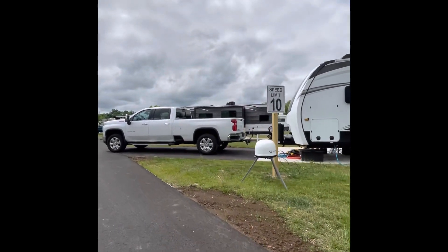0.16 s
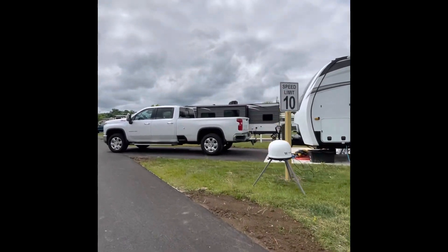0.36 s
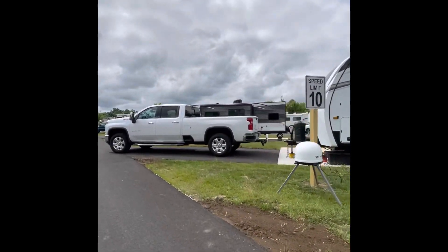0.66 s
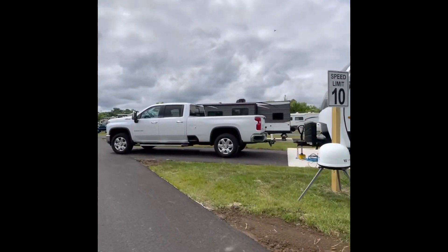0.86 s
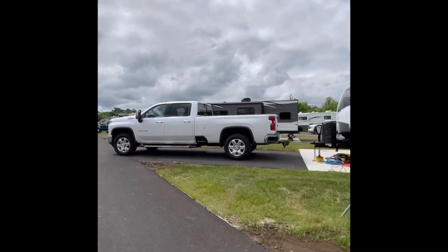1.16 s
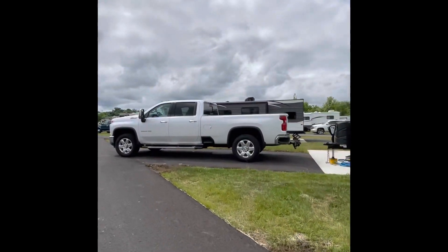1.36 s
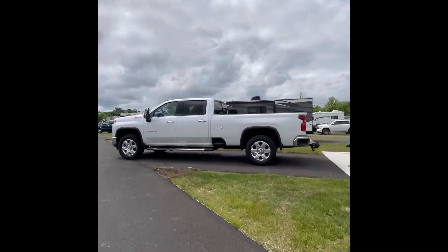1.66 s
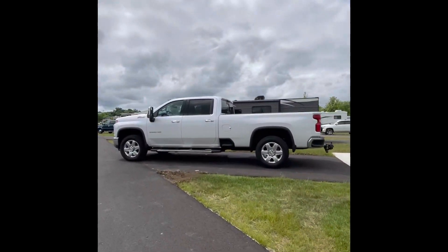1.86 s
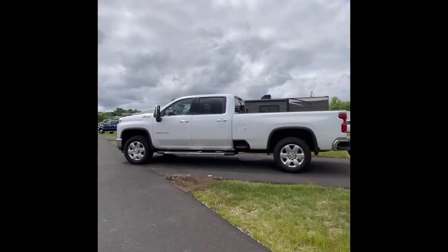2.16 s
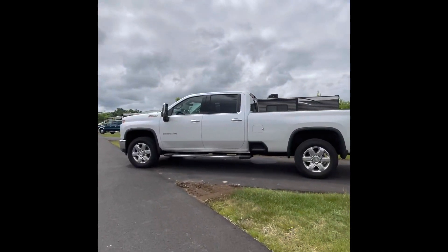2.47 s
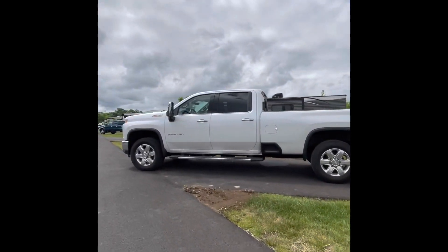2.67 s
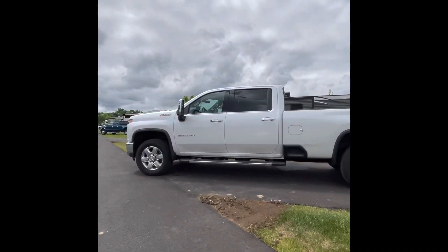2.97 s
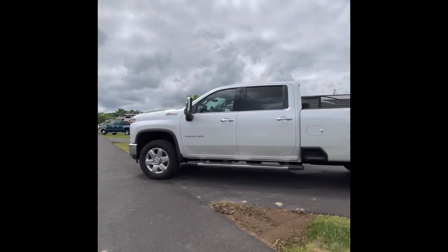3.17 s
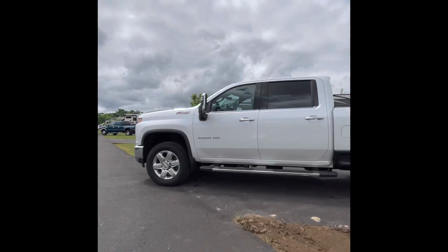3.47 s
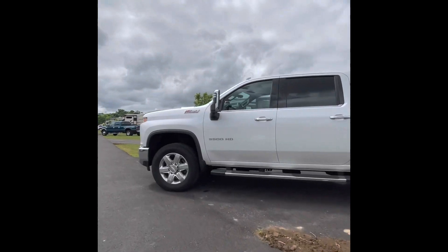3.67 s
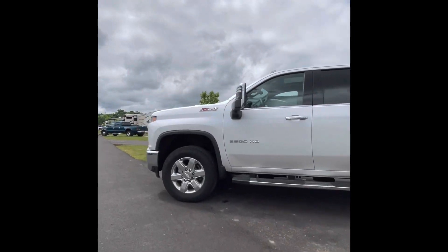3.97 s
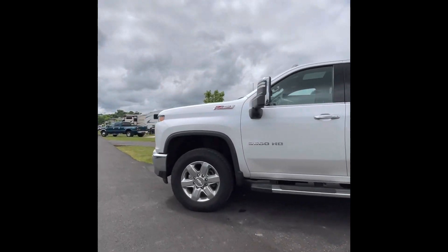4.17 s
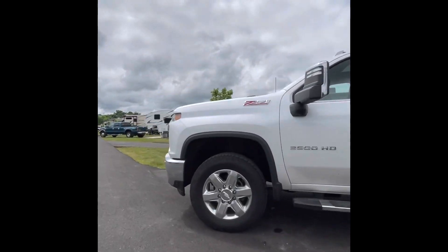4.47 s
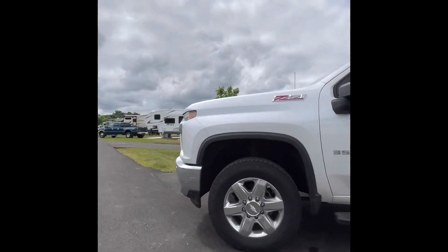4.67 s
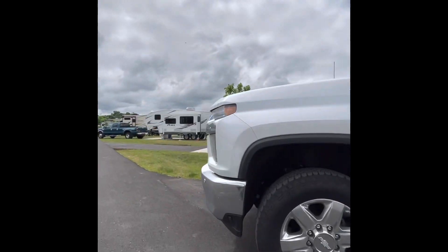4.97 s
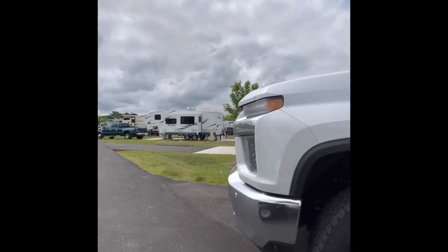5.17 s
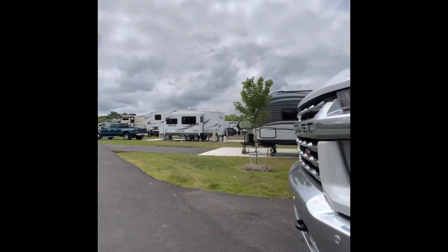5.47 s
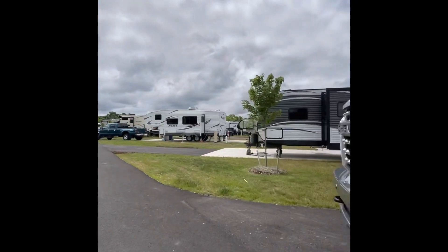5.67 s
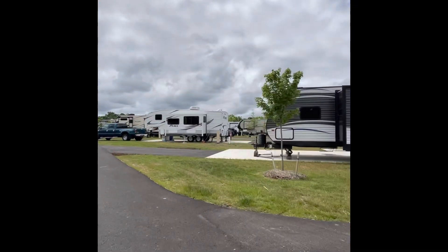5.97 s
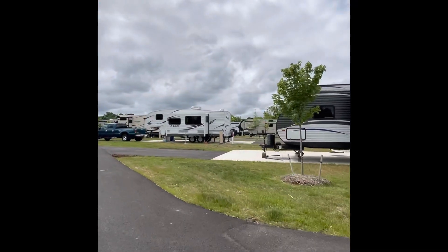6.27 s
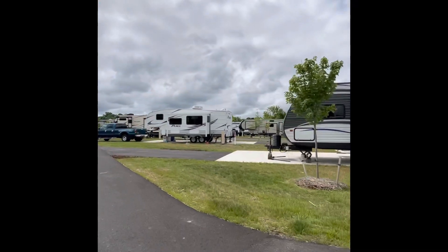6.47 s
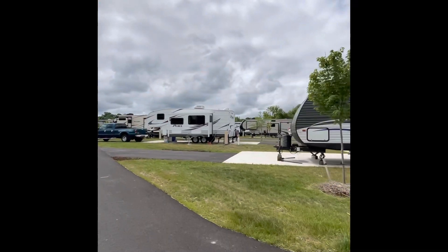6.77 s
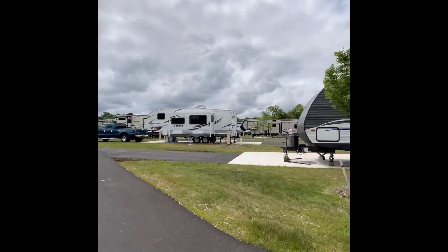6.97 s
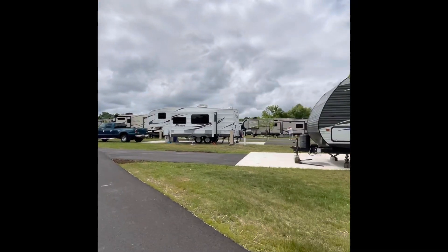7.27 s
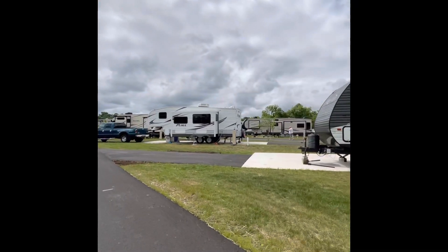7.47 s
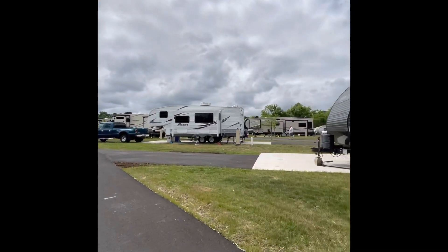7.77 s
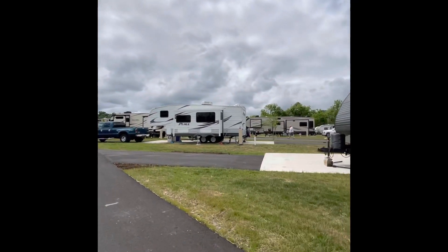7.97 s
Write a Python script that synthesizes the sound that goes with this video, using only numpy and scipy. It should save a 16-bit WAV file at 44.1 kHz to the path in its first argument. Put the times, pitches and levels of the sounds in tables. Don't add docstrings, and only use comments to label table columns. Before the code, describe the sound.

Close on-board sound of a small one-cylinder cart driving outdoors on pavement. A deep, rapid engine throb speeds up with a faint whine and valve clatter, then eases as wind bumps the microphone. Passing a parked truck, the roar reflects back with a brief falling belt whistle and sharp grit cracks. Afterward the firing slows to a low throb and begins to gather again.

```python
import sys
import numpy as np
from scipy import signal
from scipy.fft import irfft
from scipy.io import wavfile
from scipy.ndimage import uniform_filter1d

SR = 44100
rng = np.random.default_rng(int(sys.argv[2]) if len(sys.argv) > 2 else 0)


def amplitude_ratio(level_db):
    exponent = np.asarray(level_db, float) / 20
    return 10 ** exponent


def transcribe(u):
    v = np.clip(np.atleast_2d(u).T, -1, 1)
    q = np.round(v * 32767).astype(np.int16)
    wavfile.write(sys.argv[1], SR, q)


N = 357695
TIME = np.arange(N) / SR
HZ = np.fft.rfftfreq(N + 1 - N % 2 + 10000, 1 / SR)


def evened(x):
    return x / np.sqrt(np.mean(x ** 2) + 1e-20)


def curves(rows):
    seconds, *columns = np.transpose(rows)
    return [np.interp(TIME, seconds, column) for column in columns]


def read(points, hz, order=1):
    table = np.transpose(points)
    return np.interp(np.log(hz + 1), np.log(table[0] + 1), table[order])


def wander(rate_hz, count=1):
    seconds = np.arange(0, N / SR + 1, 1 / 400)
    lowpass = signal.butter(2, rate_hz, fs=400)
    slow = signal.lfilter(*lowpass, rng.standard_normal((count, len(seconds) + 200)))
    slow = slow[:, 200:]
    return np.array([np.interp(TIME, seconds, evened(row)) for row in slow])


def band(x, lo_hz, hi_hz):
    sos = signal.butter(3, [lo_hz, min(hi_hz, 20000)], "band", fs=SR, output="sos")
    return evened(signal.sosfilt(sos, x))


def beside_trailer():
    return np.clip(1 - TIME / 0.9, 0, 1)


# time_s, firing_rate_hz
GOVERNOR = [(0.0, 19.49), (0.5, 21.62), (1.0, 22.63), (1.4, 21.94), (2.0, 19.7), (2.6, 18.05), (3.2, 17.44),
            (3.7, 17.86), (4.2, 19.43), (4.7, 20.77), (5.1, 19.98), (5.8, 17.85), (6.4, 16.18),
            (6.8, 15.42), (7.2, 15.93), (7.7, 16.83), (8.11, 17.33)]
INERTIA_S, THROTTLE_S = 0.3, 0.2
FULL_PULL = 2


def speed():
    rate = uniform_filter1d(curves(GOVERNOR)[0], round(INERTIA_S * SR), mode="nearest")
    pull = np.gradient(rate) * SR
    pull = uniform_filter1d(pull, round(THROTTLE_S * SR), mode="nearest")
    return rate, np.tanh(pull / FULL_PULL)


# centre_s, peak_db, half_length_s
GUSTS = [
    (.6, -54, .3),
    (1.4, -53, .12),
    (1.78, -47, .1),
    (2.05, -48, .06),
    (2.45, -50, .08),
    (2.88, -48, .06),
    (6.6, -55, .12),
]
CALM_DB = -60.5


def wind():
    lumps = amplitude_ratio(CALM_DB)
    for centre_s, peak_db, half_s in GUSTS:
        lumps = lumps + amplitude_ratio(peak_db) * np.exp(-((TIME - centre_s) / half_s) ** 2)
    lumps = lumps * amplitude_ratio(6.5 + 2.5 * wander(9)[0])
    return lumps * band(rng.standard_normal((2, N)), 55, 170)


# start_s, end_s, level_db
SAND = [
    (.1, 1.05, -70),
    (1.18, 1.45, -71),
    (1.58, 2.53, -71),
    (4.1, 5.95, -70),
    (4.3, 5.05, -71),
    (5.24, 5.45, -67),
]
CLEAN_DB, SAND_EDGE_S = -72.5, 0.04


def fizz():
    sizes = amplitude_ratio(3.0 * np.minimum(rng.exponential(1, N), 5))
    falls = rng.random(N) < 2500 / SR
    grains = sizes * falls * rng.choice([-1, 1], N)
    hiss = band(0.6 * evened(grains) + rng.standard_normal(N), 13250, 15050)
    sand = amplitude_ratio(CLEAN_DB)
    for start_s, end_s, level_db in SAND:
        sand = sand + amplitude_ratio(level_db) * (TIME > start_s) * (TIME < end_s)
    sand = uniform_filter1d(sand, round(SAND_EDGE_S * SR))
    return sand * amplitude_ratio(1.2 * wander(10)[0]) * hiss * np.array([[1], [0.15]])


# start_s, peak_db, length_s, top_band_extra_db
GRIT = [(0.128, -54, 0.042, -0.5), (0.298, -54, .03, 2.5), (0.386, -57.5, .02, -3),
        (0.461, -51.5, 0.02, -4), (0.82, -52, 0.02, -2), (0.967, -53, 0.016, -1), (1.196, -59, 0.023, -4),
        (1.43, -55, 0.02, 1), (2.1, -49.5, 0.02, -7), (2.163, -57.5, 0.023, -3), (2.444, -56, 0.022, -4),
        (2.935, -43.5, 0.024, -11), (5.25, -43, 0.012, -1.5), (5.297, -42, 0.013, -3),
        (5.345, -39, 0.015, -3), (5.384, -44.5, 0.022, -5), (5.559, -49, 0.02, -1),
        (5.774, -49, 0.02, -3.5), (6.644, -45, 0.033, -7.5)]


def grit():
    shape = np.zeros((2, N))
    for start_s, peak_db, length_s, top_db in GRIT:
        at = round(start_s * SR)
        decay = np.exp(-TIME[:SR // 2] / max(length_s, 0.003))
        shape[:, at:at + SR // 2] += amplitude_ratio(np.array([[peak_db], [peak_db + top_db]])) * decay
    main, top = shape
    a, b, c, d = rng.standard_normal((4, N))
    both = top * band(a, 13000, 15600) + 0.74 * main * band(b, 3000, 9300)
    apart = main * (0.8 * band(c, 8000, 12500) + 0.6 * band(d, 3000, 8000))
    return amplitude_ratio(-8) * np.array([both, apart])


# time_s, pitch_hz, level_db
WHISTLES = [
    [(4.55, 1000, -60), (4.75, 960, -42), (4.9, 920, -38), (5.05, 830, -40), (5.3, 790, -41),
     (5.5, 780, -60)],
    [(2.6, 1570, -62), (3.3, 1560, -47), (4.0, 1560, -47), (4.4, 1570, -54), (5.1, 1570, -46),
     (5.6, 1570, -50), (6.0, 1570, -65)],
    [(.2, 3650, -68), (.5, 3700, -57), (1.3, 3720, -52), (1.5, 3680, -60), (2.0, 3600, -70)],
]


def whistle(rows):
    pitch_hz, level_db = curves(rows)
    fuzz = wander(0.02 * rows[0][1], count=2)
    spin = np.exp(2j * np.pi * np.cumsum(pitch_hz) / SR)
    line = ((fuzz[0] + 1j * fuzz[1]) * spin).real
    sounding = (TIME > rows[0][0]) * (TIME < rows[-1][0])
    return amplitude_ratio(level_db) * sounding * line * np.array([[0.6], [0.85]])


VALVE_DB, VALVE_FROM, VALVE_FULL = -50, 19.7, 21.6
VALVE_PLACE, VALVE_SHARP = 0.35, 1.5


def valves(turns):
    rate, throttle = speed()
    loose = np.clip((rate - VALVE_FROM) / max(VALVE_FULL - VALVE_FROM, 0.1), 0, 1)
    loose = loose * amplitude_ratio(-2.5 * throttle)
    ticks = evened(np.exp(VALVE_SHARP * np.cos(4 * np.pi * (turns - VALVE_PLACE))))
    a, b = band(rng.standard_normal((2, N)), 2760, 3600)
    return amplitude_ratio(VALVE_DB) * loose * ticks * np.array([a, 1.3 * b - 0.7 * a])


def patchy(x, patch_db):
    z = signal.stft(x, nperseg=512, noverlap=384)[2]
    patches = rng.standard_normal(z.shape[1:])
    for size, axis in [(3, 0), (12, 1), (8, 1)]:
        patches = uniform_filter1d(patches, size=size, axis=axis)
    z = z * amplitude_ratio(patch_db * evened(patches))
    return signal.istft(z, nperseg=512, noverlap=384)[1][:, :N]


# time_s, echo_db
WALLS = [(0, 2.5), (.3, 3), (.9, -0.55), (1.7, -0.6), (2.3, -1.5), (3.3, -0.1), (4.1, 1.1), (4.5, 1.8),
         (5.0, 1.1), (5.4, 0.3), (5.9, 2.5), (6.15, 0.3), (6.7, -0.6), (7.2, -0.2), (8.11, -1.7)]
# rise_db_per_firing_rate_hz, echo_share, trailer_db
ROAR = [(1.43, 0.16, 4.5), (0.73, 0.4, 0.5), (1.18, 1.4, -1), (0.34, 1.9, -2)]
# top_hz, once_a_cycle_db, its_place_0_to_1, twice_a_cycle_db, its_place_0_to_1
LAYERS = [(650, 0.7, .85, 0.5, 1), (2600, 0.82, 0.94, 0.64, 0.8), (8150, .5, 0.3, 0.6, .9),
          (22050, 1.3, .05, 0.9, .9)]
# pitch_hz, sum_db, difference_db
COLOUR = [(20, -71, -99), (40, -45, -91.5), (95, -43, -73.5), (149, -43.5, -63), (244, -46, -52.5),
          (390, -48.5, -48), (906, -54, -48.5), (1375, -58, -54), (1790, -59, -55.5), (2830, -65.5, -58),
          (3760, -67.5, -65), (5120, -73, -74.5), (9640, -87, -82.5), (14100, -95, -94.5)]
# pitch_hz, width_hz, sum_db, difference_db
BODY = [(349, 16, 3, -0.5), (529.6, 28, 5, 4), (819, 76, 7, 6), (917, 48, 5.5, 3), (975, 14, -8.5, -3.5),
        (1064, 68, 8.5, 3.5), (1200, 80, 1, 3), (1503, 70, 6, 6), (1591, 36, 9.5, 7), (1874, 51, 4, 0),
        (2053, 46, 9.5, 7), (2215, 72, 4, 1.5), (2590, 68, 11.5, 4), (2640, 100, -12, -3.5),
        (2990, 110, 2, -1.5), (3600, 140, 2.5, 3.5), (3880, 190, 2, -8.5), (5240, 360, -8.5, -3.5),
        (5220, 350, 5, 8), (1810, 120, -2, -5.5), (1370, 230, -1.5, -3), (6200, 500, 2.5, 0.5),
        (8300, 700, 1, -2), (10710, 610, -22, 4)]
# pitch_hz, in_phase_share, quarter_turn_share
PORTS = [(90, -0.47, -0.21), (170, -0.3, 0.34), (250, -0.43, -0.27), (400, -0.51, 0.2), (600, 0.069, 0.55),
         (900, 0.32, 0.38), (1400, 0.28, 0.25), (2100, 0.099, 0.24), (3800, -0.01, -0.56),
         (4800, 0.1, -0.27), (5500, -0.1, 0.24), (6500, -0.09, 0.3), (8500, -0.1, 0.11),
         (12500, -0.0, -0.27)]


def roar(turns):
    a, b, c, d = rng.standard_normal((len(HZ), 4)).T
    share = read(PORTS, HZ) + 1j * read(PORTS, HZ, order=2)
    first = a + 1j * b
    own = np.sqrt(np.clip(1 - abs(share) ** 2, 0, 1)) * (c + 1j * d)
    pair = np.array([first, share * first + own])
    colour_db = np.array([read(COLOUR, HZ), read(COLOUR, HZ, order=2)])
    for pitch_hz, width_hz, sum_db, difference_db in BODY:
        ring = 1 + (2 * (HZ - pitch_hz) / width_hz) ** 2
        colour_db = colour_db + np.array([[sum_db], [difference_db]]) / ring
    pair *= amplitude_ratio(colour_db)

    out, below = np.zeros((2, N)), np.zeros(len(HZ))
    gusts = wander(13.0, count=5)
    rate, echo_db = speed()[0], curves(WALLS)[0]
    for (top_hz, once, at, twice, at2), (faster, echo, trailer_db), gust in zip(LAYERS, ROAR, gusts):
        db = faster * rate + echo * echo_db + trailer_db * beside_trailer()
        upto = 1 / (1 + (HZ / top_hz) ** 6) if top_hz < 20000 else np.ones(len(HZ))
        layer = irfft(pair * (upto - below))[:, :N]
        below = upto
        throb = once * np.cos(2 * np.pi * (turns - at)) + twice * np.cos(4 * np.pi * (turns - at2))
        out += layer * amplitude_ratio(db - db.mean() + throb + 0.4 * gust + 0.25 * gusts[4])
    return amplitude_ratio(80.5) * patchy(out, patch_db=1.87)


OFF_BOOM = {3: (-46, -.8), 4: (-29.3, -4.8), 5: (-35.3, 1.5), 6: (-60, 0), 7: (-41.9, 2.3), 8: (-41, 4)}


def boom(rate, throttle, k, boom_hz, width_hz, level_db, open_db):
    peak = amplitude_ratio(level_db + open_db * throttle) / (1 + ((k * rate - boom_hz) / width_hz) ** 2)
    plain_db, plain_open_db = OFF_BOOM[k]
    plain = amplitude_ratio(plain_db + plain_open_db * throttle)
    return 20 * np.log10(np.hypot(peak, plain)) + 3 * beside_trailer()


# order, boom_hz, width_hz, level_db, open_throttle_extra_db
BOOMS = [(3, 64.6, 6.5, -31, .7), (4, 89, 6.3, -14.5, -.7), (5, 98.9, 18.4, -22.7, 3.5),
         (6, 96.8, 13.3, -20.6, .4), (7, 107.7, 13.7, -33, 2.4), (8, 176, 24, -33, 2.2)]
# pitch_hz, level_db
SILENCER = [(24, -72), (38, -41), (48, -40), (54, -45), (63, -33), (112, -31), (124, -35), (138, -42),
            (158, -35), (178, -47), (200, -43), (260, -45), (340, -50), (420, -62)]
# order, lag_rad (at 18 firings per s), change_rad_per_firing_rate_hz
PATH_LAG = [(2, 1.4, 0.78), (3, 2.8, 0.22), (4, -0.6, 0.5), (5, -1.8, 0.02), (6, -1.9, 0.18),
            (7, 2.2, -0.74), (8, -0.2, -0.4), (9, -1.5, -0.28), (10, -2.0, -0.38), (11, -2.1, 0.34),
            (12, 1.3, -1.02)]
# pitch_hz, difference_db
PANEL = [(60, -75), (140, -66), (170, -53), (190, -56), (215, -50), (245, -59), (330, -68)]


def engine(turns):
    rate, throttle = speed()
    own = {row[0]: boom(rate, throttle, *row) for row in BOOMS}
    lags = {k: lag + slope * (rate - 18) for k, lag, slope in PATH_LAG}
    load_db = 1.7 * (rate - 19)
    flutter, out = wander(8.4, count=64), np.zeros((2, N))
    for k in range(1, 20):
        if k in own:
            db = own[k]
        else:
            db = read(SILENCER, k * rate) + min(k / 10, 1) ** 2 * load_db
        gain = amplitude_ratio(db + (0.4 + 0.013 * k * k) * flutter[k])
        jitter = (0.03 + 0.004 * k * k) * flutter[20 + k]
        angle = 2 * np.pi * k * turns - lags.get(k, k * k) + jitter
        panel_db = read(PANEL, k * rate) + 0.6 * load_db + 2.5 * flutter[40 + k]
        out[0] += gain * np.cos(angle)
        out[1] += 0.02 * gain * np.cos(angle + 3) + amplitude_ratio(panel_db) * np.cos(angle + 2.4)
    for k in range(3):
        gain = amplitude_ratio(-44 + 1.6 * load_db + 3 * flutter[60 + k])
        out[0] += gain * np.cos(2 * np.pi * (k + 3.5) * turns + flutter[61 + k])
    return np.sqrt(2) * out * amplitude_ratio(1.3 * wander(10)[0])


def scene():
    turns = np.cumsum(speed()[0]) / SR
    both, apart = (wind() + fizz() + grit() + sum(map(whistle, WHISTLES)) + valves(turns)
                   + roar(turns) + engine(turns))
    return np.array([both + apart, both - apart])


def top_cut(x):
    return signal.sosfilt(signal.butter(12, 16210, fs=SR, output="sos"), x)


def record(dry):
    bass = signal.butter(3, 29, "high", fs=SR, output="sos")
    top = signal.butter(12, 15450, fs=SR, output="sos")
    mix = signal.sosfiltfilt(np.vstack([bass, top]), dry)
    return top_cut(mix)


dry = scene()
out = record(dry)
transcribe(out)
```